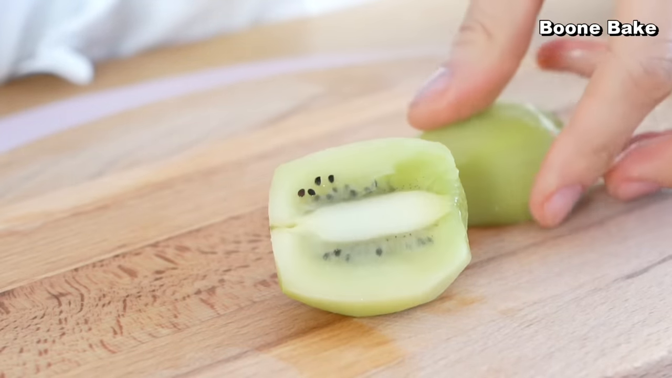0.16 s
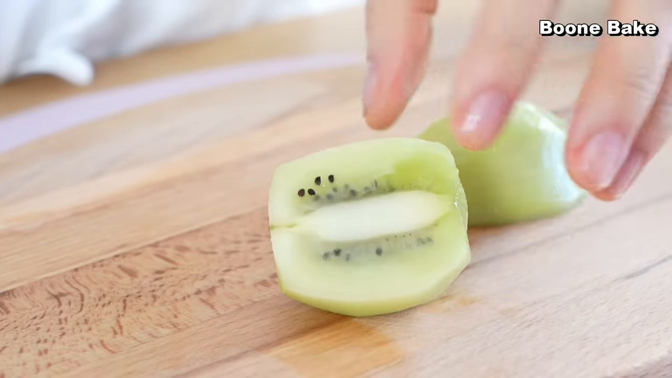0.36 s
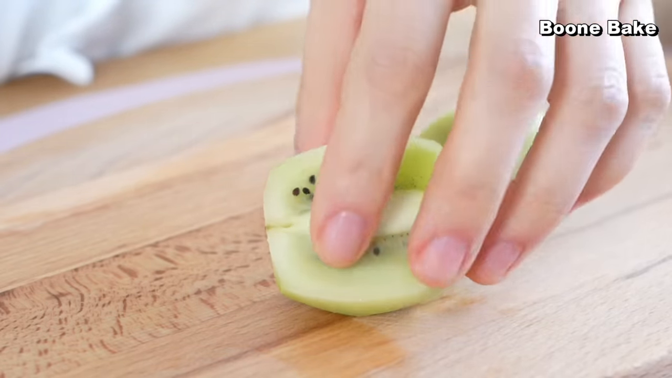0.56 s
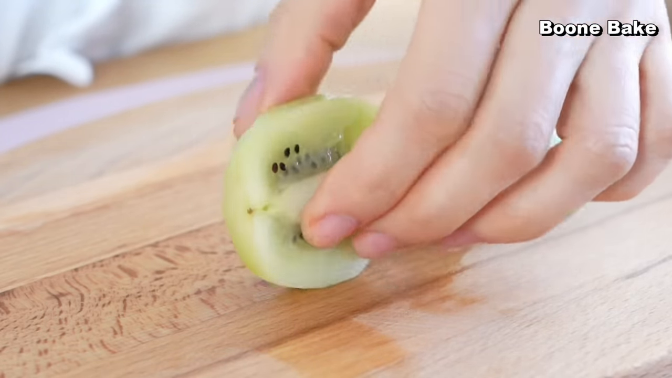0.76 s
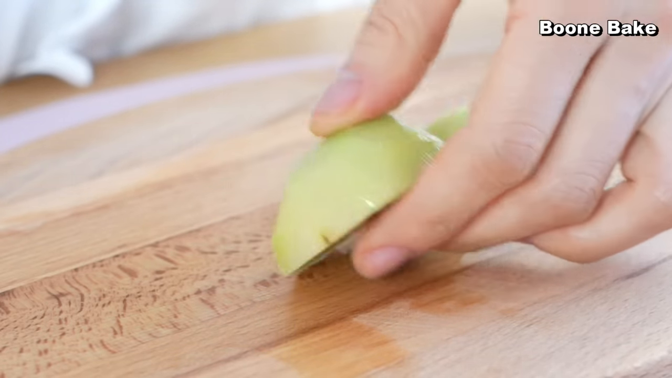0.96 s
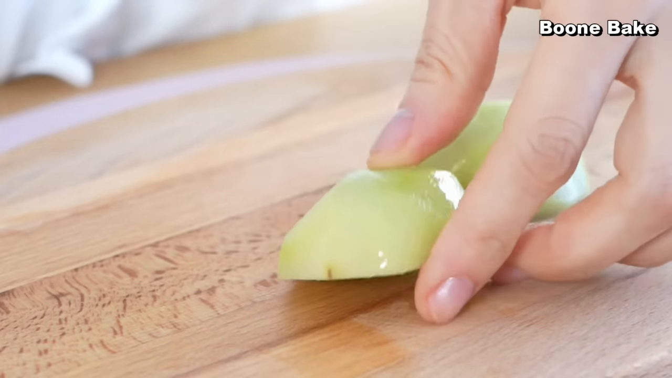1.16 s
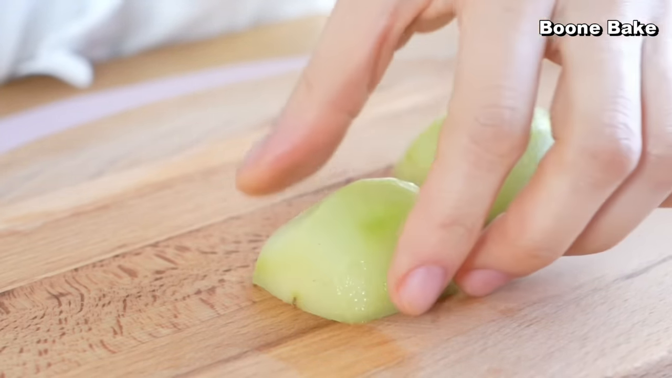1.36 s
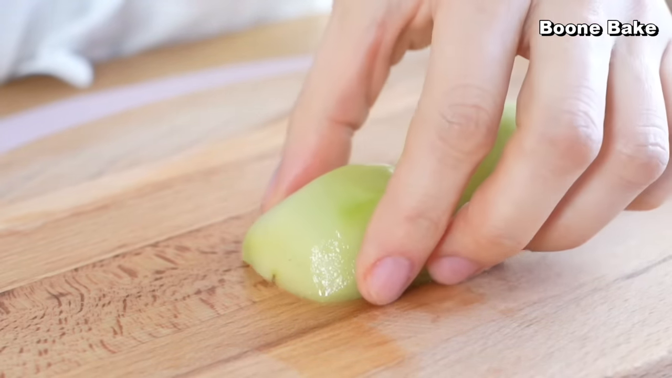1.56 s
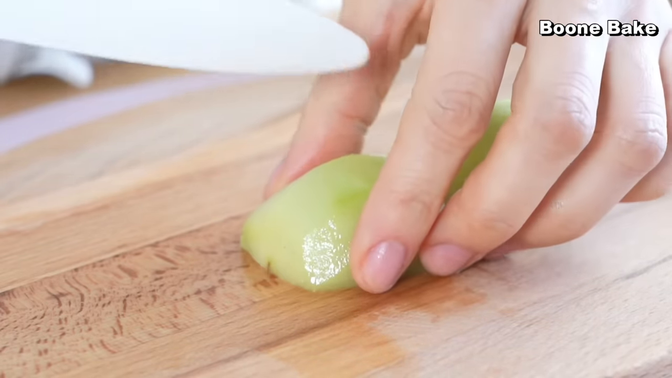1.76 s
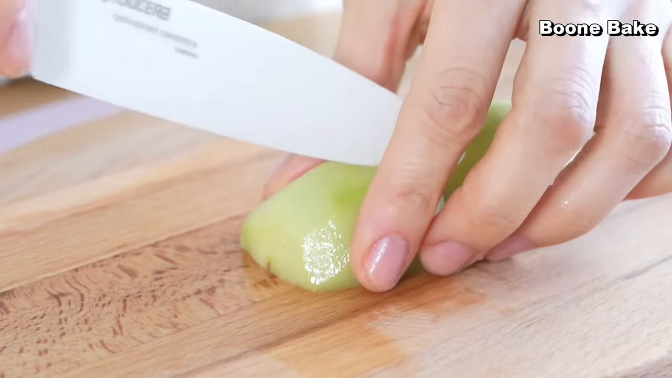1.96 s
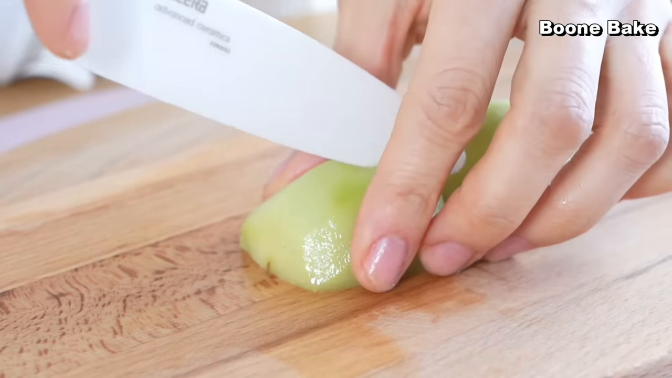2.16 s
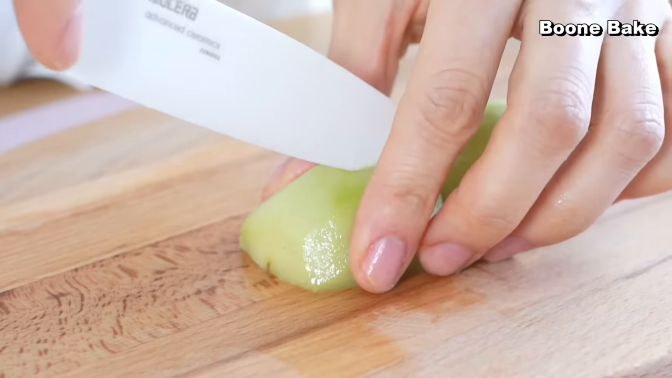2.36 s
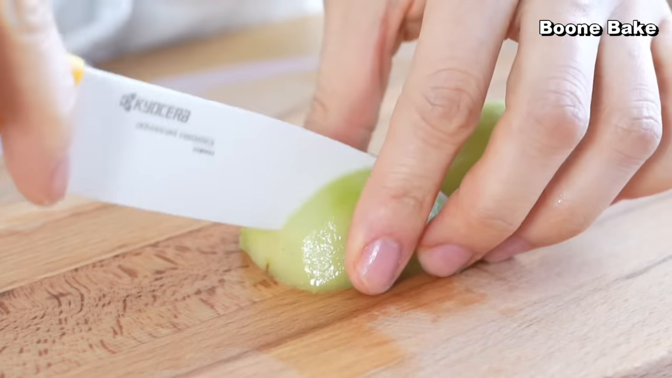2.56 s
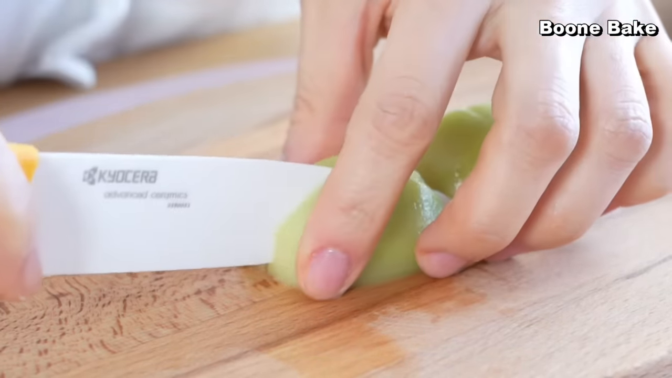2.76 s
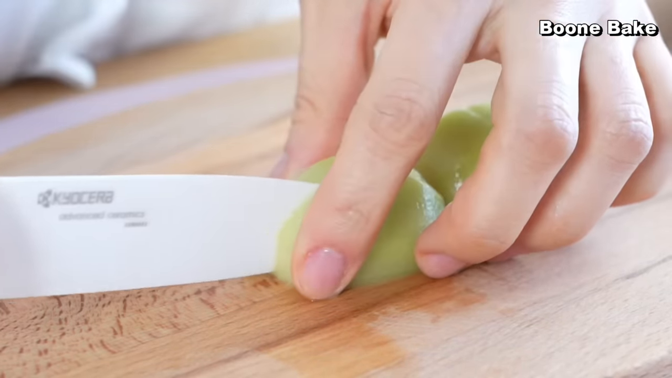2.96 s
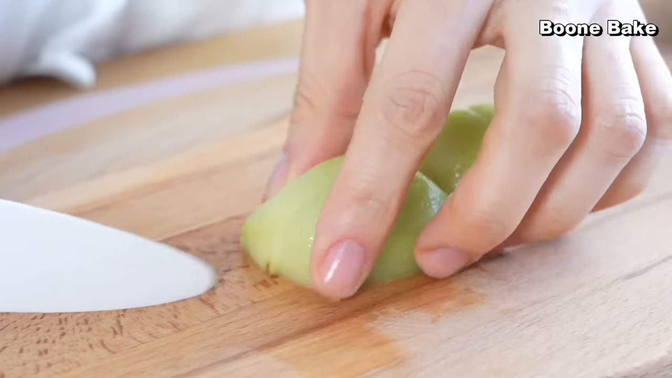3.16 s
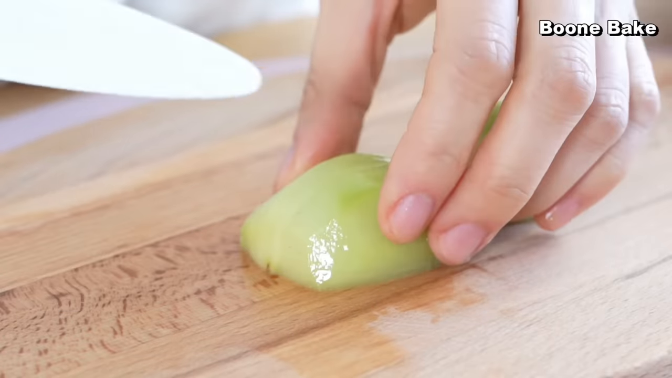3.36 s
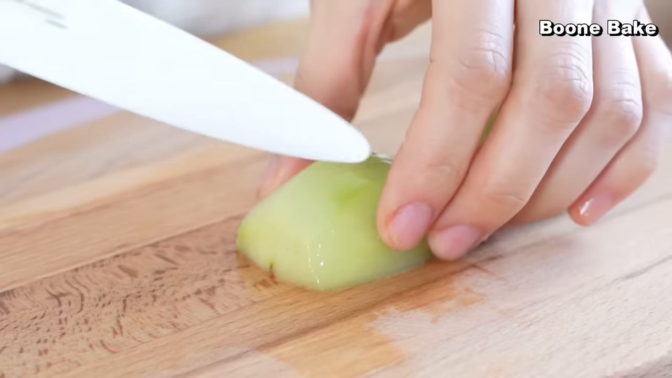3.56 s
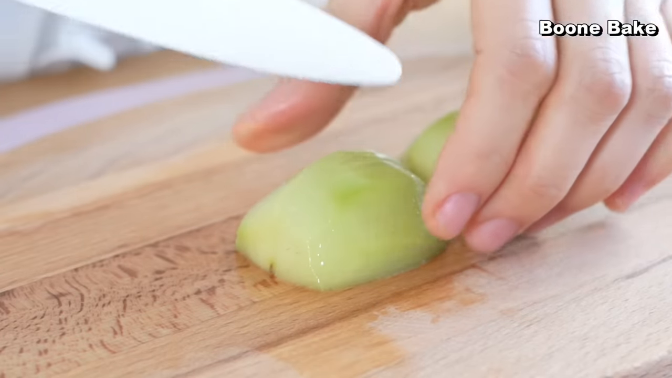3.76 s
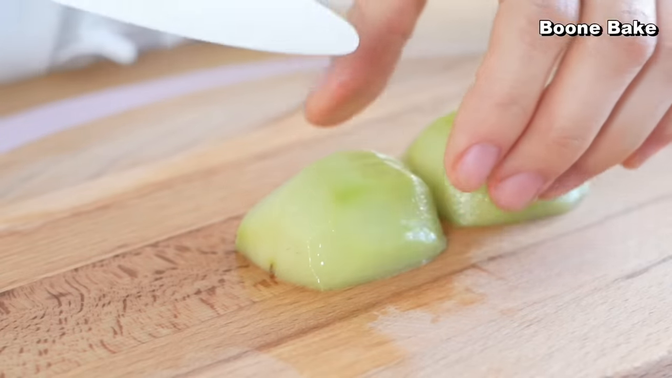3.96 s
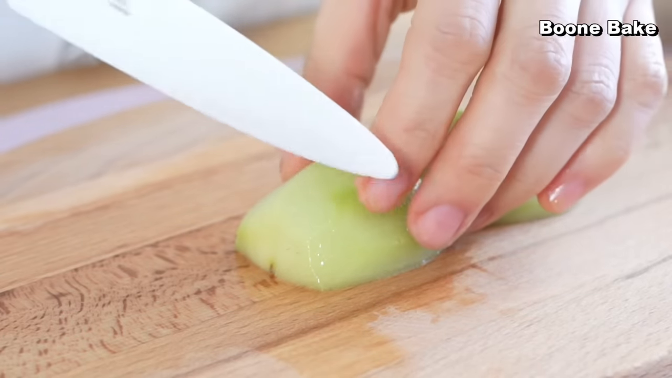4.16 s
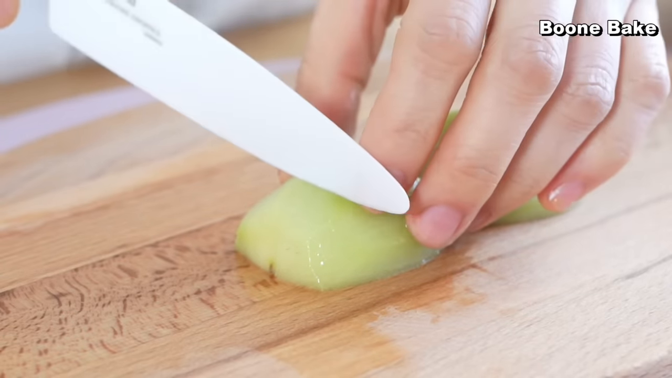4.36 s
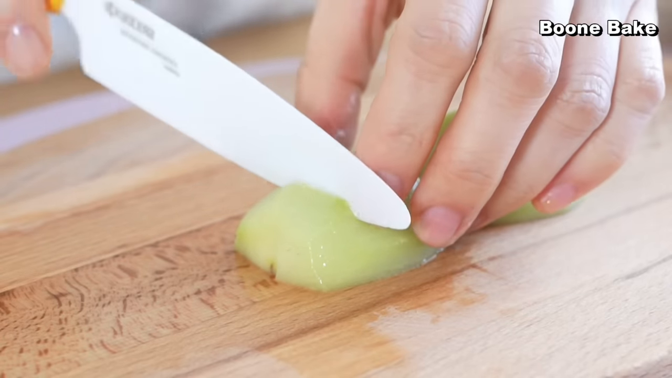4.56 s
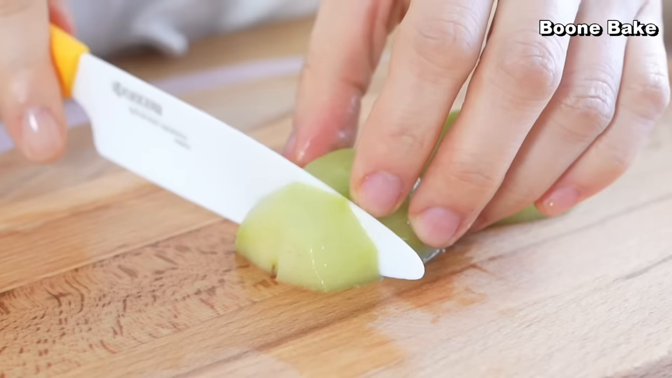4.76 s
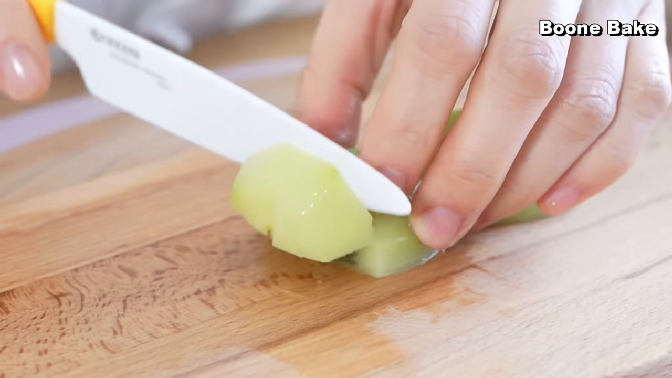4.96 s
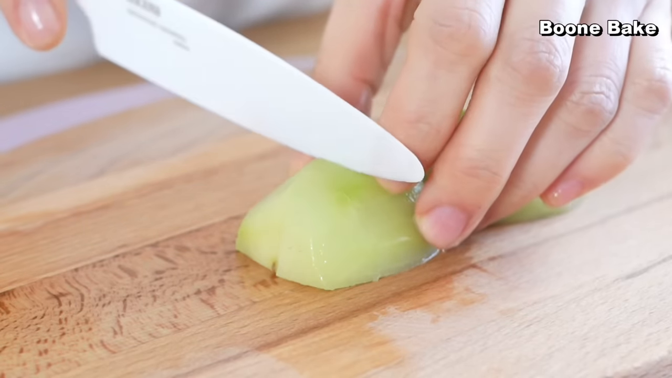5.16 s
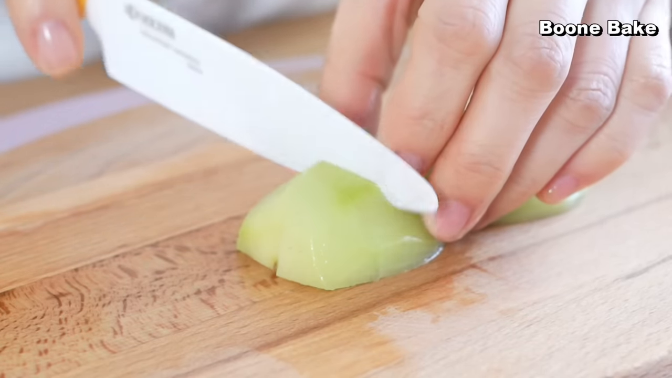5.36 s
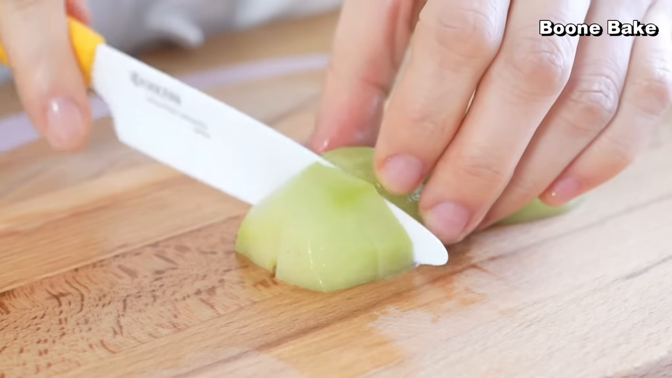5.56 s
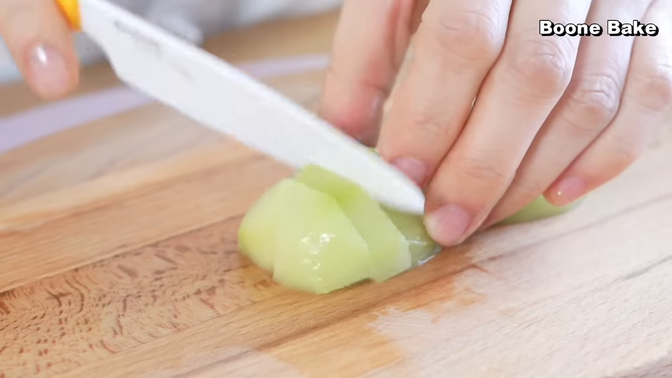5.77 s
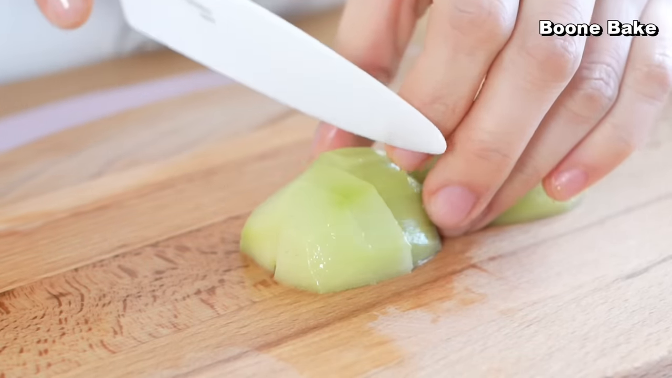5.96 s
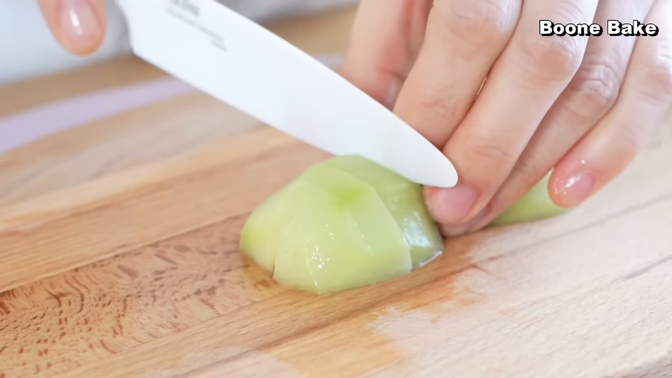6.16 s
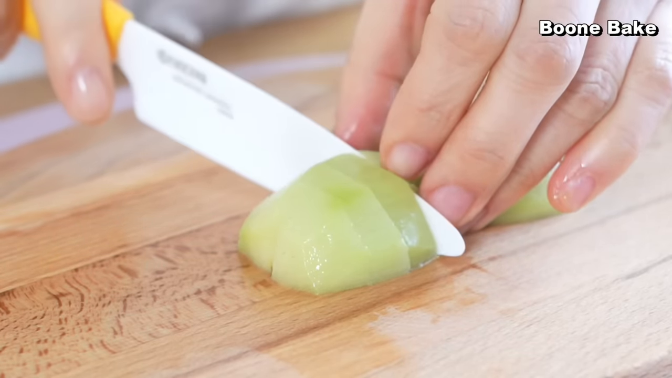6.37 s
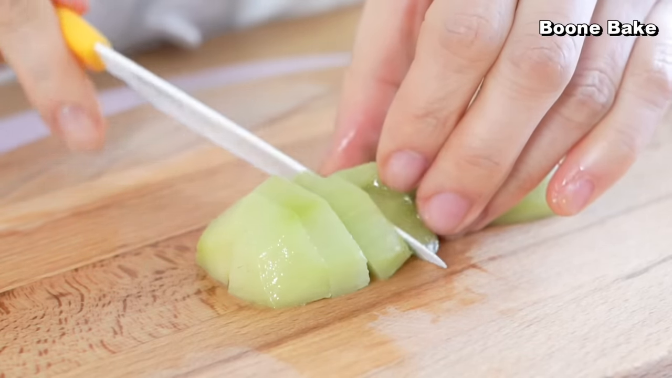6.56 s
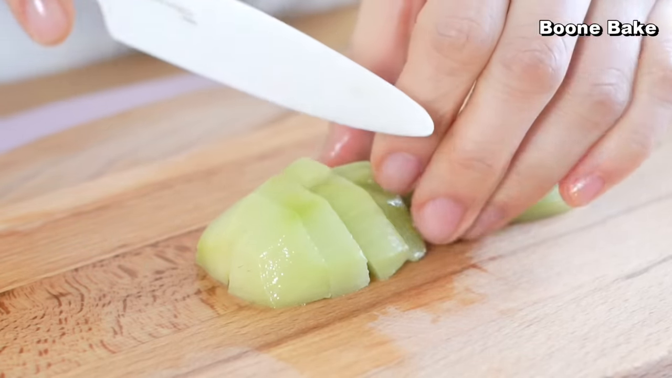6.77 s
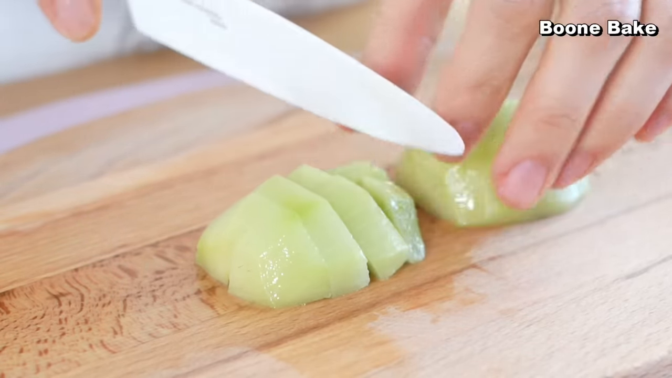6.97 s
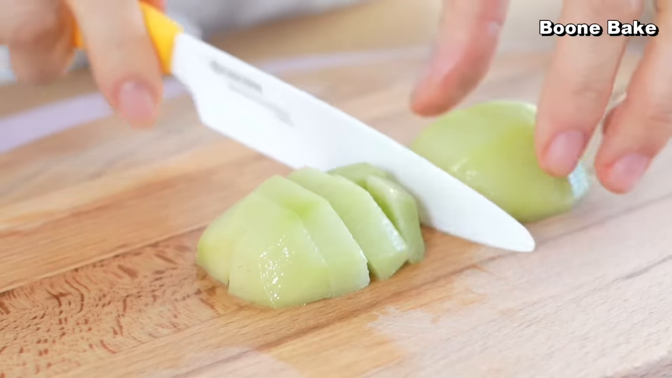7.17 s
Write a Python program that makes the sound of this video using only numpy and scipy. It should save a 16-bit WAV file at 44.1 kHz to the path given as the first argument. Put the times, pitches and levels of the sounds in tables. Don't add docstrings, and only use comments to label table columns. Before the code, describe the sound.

A quiet kitchen with soft hiss and a very low table sway, miked closely in mono. At 0.1 s fingers brush and squeak faintly on wet fruit, then a dull woody bump at 0.17. Another brush leads to a second, slightly clickier bump at 1.28, with a faint touch at 1.47. Tiny sticky ticks gather from 2.1. The first cut rasps wetly from 2.43, catches briefly, and knocks the wood at 2.53. From 2.9 to 3.25 the blade drags back, scratchy and brightening into a thin squeal. Near quiet follows, with a faint touch at 4.3. Stronger wet slides end in hard, short knocks at 4.73, 5.51 and 6.35, the table rumbling low after each. Bright juice snaps click at 4.86 and 5.65, with small ones around 6.5. Light bumps fall near 5.15. The background dips slightly after 6.64, until a final solid knock at 7.16 and a brief rubbing settle.

```python
import sys
import numpy as np
from scipy import signal
from scipy.fft import rfft, irfft
from scipy.io import wavfile
from scipy.ndimage import uniform_filter1d

SR = 44100
rng = np.random.default_rng(int(sys.argv[2]) if len(sys.argv) > 2 else 0)


def log_audio(samples):
    frames = np.atleast_2d(samples).T
    limited = np.clip(frames, -1, 1)
    pcm = np.round(limited * 32767).astype(np.int16)
    wavfile.write(sys.argv[1], SR, pcm)


def linear_from_db(decibels):
    return 10 ** (np.asarray(decibels, float) / 20)


N = 318402

# time_s, level_db
AIR_LEVEL = [(0, -63.5), (.4, -61.5), (1.0, -60), (1.5, -62), (1.95, -57.5), (2.15, -60.5), (2.6, -59.5),
             (3.3, -58), (3.6, -57), (4.3, -59.5), (5.9, -61), (6.2, -59.5), (6.6, -59), (7.22, -62.5)]
# pitch_hz, level_db (per Hz)
AIR_TONE = [(15, -35.5), (25, -6), (49, -10), (300, -17.5), (500, -21.5), (2000, -30.5), (13200, -41),
            (16000, -48.5)]
# strongest_s, level_db, pitch_hz, rise_s, fall_s
TABLE_ROCKS = [(0.0, -46.5, 36, .1, 0.08), (.3, -56.5, 21.6, 0.12, 0.36), (1.41, -51, 38, .2, .1),
               (1.71, -47, 22.2, 0.14, 0.13), (2.689, -32, 18, 0.1, 0.076), (2.87, -37.5, 16.5, .05, 0.11),
               (3.1, -42.5, 21, 0.086, 0.087), (3.45, -53, 21, 0.3, 0.25), (3.9, -52, 25, 0.23, 0.13),
               (4.83, -36.5, 21.4, .07, 0.1), (4.97, -37, 22.2, 0.095, .22), (5.35, -48, 22.2, 0.061, .1),
               (5.718, -33, 22.2, 0.17, 0.17), (6.15, -53, 23, 0.11, 0.24), (6.588, -30, 22.8, 0.19, 0.16),
               (6.95, -47.5, 22.2, .15, 0.11)]
# start_s, rumble_db, rasp_db, blade_db
SETTLES = [
    (0.0, -52.5, -50, -56.5),
    (4.875, -56, -54, -74),
    (5.665, -53, -42.5, -57),
    (7.175, -43, -41, -68),
]
# centre_s, length_s, rasp_db, hiss_db
BRUSHES = [
    (.12, 0.075, -54, -61),
    (1.165, 0.082, -54, -63),
    (4.944, 0.011, -53, -47),
]
# entry_s, full_speed_s, rumble_db, rasp_db, hiss_db
CUTS = [
    (2.43, 2.497, -35, -42.5, -46.5),
    (4.55, 4.675, -33, -39, -45),
    (5.345, 5.456, -33, -39, -44.5),
    (6.25, 6.293, -31.5, -38, -43.5),
]
# time_s, loss_db
CATCHES = [
    (2.517, 17),
    (4.632, 7),
    (5.472, 9.5),
    (6.316, 4),
]
# time_s, pressure_db
DRAW_BACK = [
    (2.9, -69),
    (2.974, -47),
    (3.05, -45),
    (3.064, -45.5),
    (3.14, -41),
    (3.232, -42.5),
    (3.258, -68),
    (3.3, -75),
]
# pitch_hz, width_hz, level_db
RUMBLE_PEAKS = [(110, 47, -3.5), (139, 31, 1), (182, 42, -3.5), (261, 31, -2.5), (309, 49, -7),
                (383.5, 55, -13)]
# pitch_hz, width_hz, level_db
RASP_PEAKS = [(415, 130, -8.5), (696, 190, -4), (1050, 370, 1), (1350, 540, 0), (1680, 420, -3),
              (2116, 440, -8.5)]
# pitch_hz, width_hz, level_db
BLADE_LOW_PEAKS = [(3200, 1400, 2), (4220, 590, 7.5), (4800, 780, 3), (6310, 1100, 2.5), (6720, 300, -15.5)]
# pitch_hz, width_hz, level_db
BLADE_HIGH_PEAKS = [(8540, 720, 4.5), (9640, 910, -7), (12300, 980, -9), (13260, 1200, -2),
                    (14400, 700, -11), (15500, 700, -9)]
# start_s, length_s, pitch_hz, width_hz, level_db (rms)
SQUEAKS = [(0.083, 0.074, 3670, 500, -59.5), (1.133, 0.06, 2230, 300, -58), (1.139, .06, 3500, 300, -60),
           (2.475, 0.044, 3200, 300, -54), (2.94, 0.14, 4040, 350, -55.5), (2.98, .12, 2150, 300, -49),
           (3.12, 0.15, 6500, 600, -49.5), (4.6, 0.1, 8600, 500, -56), (4.57, .07, 3880, 400, -55),
           (6.27, 0.051, 8700, 497.5, -52), (3.011, 0.064, 1050, 70, -43), (3.077, .04, 6050, 600, -46),
           (3.135, 0.051, 8600, 90, -42.5), (3.2, .075, 15400, 150, -60), (5.155, .055, 8400, 500, -73),
           (5.372, 0.093, 3830, 300, -55.5)]
# time_s, knock_db, thud_db, crack_db, upper_knock_db
BLOWS = [(0.1663, -27, -24.5, -37, -42.5), (1.276, -28.5, -26.5, -30, -42.5), (1.468, -59, -55, -56, -67),
         (2.527, -19, -37, -45, -34), (4.319, -63, -49.5, -65, -73), (4.727, -11.5, -32.5, -36, -33),
         (5.149, -47, -36.5, -39.5, -55), (5.2, -58, -42, -44, -68), (5.506, -9.5, -34.5, -43, -25.5),
         (6.064, -64, -51.5, -45, -69), (6.352, -16, -31.5, -40, -36), (7.163, -18, -43, -45, -31.5)]
# pitch_hz, level_db, t60_s (time to fade by 60 dB)
THUD_MODES = [(122, 3.5, .04), (120, -11.5, 0.2), (145.6, -16, .45), (145.7, -9, 0.24), (185, -13, .12)]
# pitch_hz, level_db, t60_s
FLEX_MODES = [(250, -3.5, 0.11), (265.3, -1.5, .2), (301, -2, 0.13), (376, -4.5, 0.21), (493, -8, .08)]
# pitch_hz, level_db, t60_s
KNOCK_MODES = [(510, -21, 0.02), (681, -12, 0.041), (726, -7.5, 0.023), (927, -0.5, 0.02), (1050, 0, .022),
               (1253, -8.5, 0.012)]
# pitch_hz, level_db, t60_s
UPPER_KNOCK_MODES = [(1580, 1.5, .015), (1750, -3.5, 0.0098), (2120, 2, 0.012), (2315, -5, 0.0068),
                     (2960, -10.5, 0.01), (3500, -14, 0.012), (4400, -14.5, 0.0072)]
# pitch_hz, t60_s
ROOM_DECAY = [(125, 0.99), (250, 0.93), (500, 0.74), (1000, 0.52), (2000, 0.44), (4000, 0.29), (8000, 0.33),
              (16000, 0.085)]
# time_s, peak_db, pitch_hz
TICKS = [(1.414, -47, 12000), (2.135, -48, 6000), (2.184, -43.5, 6000), (2.33, -47, 5000),
         (2.389, -45, 8000), (2.40, -45, 7050), (2.44, -42, 6500), (2.462, -40, 8000), (2.612, -45, 8000),
         (2.622, -42, 11000), (2.696, -42, 12000), (2.868, -53, 5000), (4.476, -37.5, 4100),
         (4.64, -31, 7000), (4.896, -43, 7000), (5.367, -43, 4000), (5.401, -33.5, 6000),
         (5.455, -36, 8000), (5.775, -40, 4000), (6.143, -46, 6000), (6.158, -46, 8000), (6.177, -42, 8040),
         (6.189, -40.5, 5000), (6.223, -39, 5000), (6.522, -37, 10100), (6.696, -47, 6000),
         (6.904, -46, 4560)]
# time_s, peak_db, pitch_hz,
# length_ms, width_ratio
JUICE_SNAPS = [(2.185, -39.5, 2130, 1.5, 1.3), (4.853, -25, 7000, 4.2, 2.2), (4.856, -18, 4970, 1.24, 2.5),
               (4.859, -12.5, 4440, 1.2, 1.62), (4.8591, -11.5, 2390, 3, 2.3), (4.86, -18, 6900, 1.4, 1.36),
               (4.938, -30.5, 3400, 5, 1.09), (4.941, -35, 4270, 5, 1.1), (4.942, -44, 8750, 4, 1),
               (5.149, -36, 8600, 2.2, 0.93), (5.20, -49, 4000, 3, 1.02), (5.619, -38, 4970, 3, 1.24),
               (5.649, -13.5, 4860, 2.7, 1.74), (5.653, -17.5, 5600, 1.7, 2.7),
               (5.657, -32, 5970, 1.5, 2.1), (6.463, -26, 5300, 1.6, 1.42), (6.463, -29.5, 1750, 2.7, 1.29),
               (6.546, -40, 6060, 3, 1.2), (7.163, -21, 1350, 4, 1.16), (7.1637, -38, 4700, 3, 1.1)]
# time_s, level_db
MIX_LEVEL = [
    (6.64, -2.5),
    (6.642, -13.5),
    (7.15, -11.5),
    (7.16, 0.5),
]


def rms_one(x):
    return x / np.sqrt(np.mean(x ** 2) + 1e-20)


def in_time(rows, outside=None):
    time_s, *columns = np.transpose(rows)
    t = np.arange(N) / SR
    return np.array([np.interp(t, time_s, column, outside, outside) for column in columns])


def band(x, low_hz, high_hz):
    limits = [low_hz, min(high_hz, .45 * SR)]
    return signal.sosfilt(signal.butter(2, limits, "band", fs=SR, output="sos"), x)


def cut_above(x, hz):
    return signal.sosfilt(signal.ellip(10, .5, 60, hz, fs=SR, output="sos"), x)


def drift(rate_hz):
    steps = int(N / SR * rate_hz) + 3
    return np.interp(np.arange(N) * rate_hz / SR, np.arange(steps), rng.standard_normal(steps))


def ring(force, hz, t60):
    r = linear_from_db(-60 / (t60 * SR))
    turn = 2 * np.pi * hz / SR
    return signal.lfilter([0, np.sin(turn)], [1, -2 * r * np.cos(turn), r * r], force + 1e-18)


def resonances(x, peaks, patchy_db):
    out = 0
    for k, (hz, width_hz, level_db) in enumerate(peaks):
        r = np.exp(-np.pi * width_hz / SR)
        poles = [1, -2 * r * np.cos(2 * np.pi * hz / SR), r * r]
        gain = linear_from_db(level_db + patchy_db * drift(18))
        out = out + (-1) ** k * gain * signal.lfilter([1 - r, 0, r - 1], poles, x)
    return out


def burst(start_s, peak_db, hz, length_ms, width):
    age = np.arange(1200) / SR / (length_ms / 1000)
    first_snap = 3 * (age == 0)
    snaps = (rng.standard_normal(len(age)) ** 3 + first_snap) * np.exp(-age ** 2)
    sound = band(snaps, hz / width, hz * width)
    out = np.zeros(N + len(age))
    i = round(start_s * SR)
    out[i:i + len(age)] = linear_from_db(peak_db) * sound / np.abs(sound).max()
    return out[:N]


def air():
    hz = np.arange(N // 2 + 1) * SR / N + 1
    corner_hz, tone_db = np.transpose(AIR_TONE)
    tone = linear_from_db(np.interp(np.log(hz), np.log(corner_hz), tone_db))
    shaped = rfft(rng.standard_normal(N)) * tone
    low_share = 1 / (1 + (hz / 900) ** 2)
    hiss_db = in_time(AIR_LEVEL)[0]
    rumble_db = -55.5 + 0.32 * (hiss_db - hiss_db.mean())
    rumble = rms_one(irfft(shaped * low_share, N)) * linear_from_db(rumble_db + .8 * drift(9))
    hiss = rms_one(irfft(shaped * (1 - low_share), N)) * linear_from_db(hiss_db + 1.3 * drift(14))
    return rumble + hiss


def sway():
    age = np.arange(N) / SR - np.array(TABLE_ROCKS)[:, :1]
    level_db, hz, rise_s, fall_s = np.array(TABLE_ROCKS).T[1:, :, None]
    swell = np.exp(-(age / np.where(age < 0, rise_s, fall_s)) ** 2)
    rocking = linear_from_db(level_db) * swell * np.cos(2 * np.pi * hz * age)
    return np.sqrt(2) * np.sum(rocking, axis=0)


def settle_strokes(t):
    gains, fall_db_per_s, sizzle_db = np.zeros((4, N)), 199, -5
    for start_s, rumble_db, rasp_db, blade_db in SETTLES:
        start_db = np.array([[rumble_db], [rasp_db], [blade_db], [blade_db + sizzle_db]])
        gains += (t >= start_s) * linear_from_db(start_db - fall_db_per_s * np.abs(t - start_s))
    return gains


def brush_strokes(t):
    gains, rumble_db, sizzle_db = np.zeros((4, N)), -0.5, -4
    for centre_s, length_s, rasp_db, hiss_db in BRUSHES:
        top_db = np.array([[rasp_db + rumble_db], [rasp_db], [hiss_db], [hiss_db + sizzle_db]])
        gains += linear_from_db(top_db) * np.exp(-(2 * (t - centre_s) / length_s) ** 2)
    return gains


def cut_strokes(t):
    gains, catch_s = np.zeros((4, N)), 0.007
    entry_db, rumble_rise_db, rumble_bend, sizzle_db = -24.5, 28, 2.38, -1
    stall_db = sum(loss_db * np.exp(-((t - s) / catch_s) ** 2) for s, loss_db in CATCHES)
    for entry_s, full_s, rumble_db, rasp_db, hiss_db in CUTS:
        wood_s = min(blow[0] for blow in BLOWS if blow[0] > full_s)
        inside = (t > entry_s) & (t < wood_s)
        speed_db = entry_db * np.clip((full_s - t) / (full_s - entry_s), 0, 1) - stall_db
        depth_left = np.clip((wood_s - t) / (wood_s - entry_s), 0, 1)
        push_db = -rumble_rise_db * depth_left ** rumble_bend
        levels_db = [push_db + rumble_db, speed_db + rasp_db, speed_db + hiss_db, speed_db + hiss_db + sizzle_db]
        gains += inside * linear_from_db(np.array(levels_db))
    return gains


def draw_strokes():
    start_db = (-26, 1, -6, -15)
    end_db = (-1.5, 1.6, 2, 1.5)
    tilt_db = in_time([(DRAW_BACK[1][0], *start_db), (DRAW_BACK[-3][0], *end_db)])
    return linear_from_db(in_time(DRAW_BACK, outside=-120) + tilt_db)


def strokes():
    t = np.arange(N) / SR
    gains = settle_strokes(t) + brush_strokes(t) + cut_strokes(t) + draw_strokes()
    return uniform_filter1d(gains, size=200, axis=1)


def grit(per_s, spread_db):
    sizes = linear_from_db(spread_db * np.minimum(rng.exponential(1, N), 5)) * rng.choice([-1, 1], N)
    return sizes * (rng.random(N) < per_s / SR)


def slides():
    fibres, juice = grit(1600, 2.7), grit(9000, 2.52)
    rumble = resonances(fibres, RUMBLE_PEAKS, patchy_db=1.4)
    rasp = resonances(fibres + .45 * juice, RASP_PEAKS, patchy_db=2.45)
    film = juice[::-1]
    hiss = resonances(juice, BLADE_LOW_PEAKS, patchy_db=0.35) + linear_from_db(-10) * band(film, 2400, 7800)
    sizzle = resonances(juice, BLADE_HIGH_PEAKS, patchy_db=5.2) + linear_from_db(-6.5) * band(film, 7000, 15500)
    uneven = [rms_one(layer) * linear_from_db(1.4 * drift(40)) for layer in (rumble, rasp, hiss, sizzle)]
    layers = np.array(uneven) * strokes()
    return layers[0], linear_from_db(-1.18) * layers[1:].sum(axis=0)


def squeaks():
    out = np.zeros(N)
    for start_s, length_s, hz, width_hz, level_db in SQUEAKS:
        noise = rng.standard_normal(int(length_s * SR))
        r = np.exp(-np.pi * width_hz / SR)
        resonance = [1, 0, -1, 1, -2 * r * np.cos(2 * np.pi * hz / SR), r * r]
        whistle = rms_one(signal.sosfilt([resonance, resonance], noise))
        swell = np.hanning(len(noise)) ** .5
        i = round(start_s * SR)
        out[i:i + len(noise)] += linear_from_db(level_db) * whistle * swell
    return out


def strike(modes, level_db, spread_db, contact_s, sign):
    at = np.round(np.array(BLOWS)[:, 0] * SR).astype(int)
    luck = rng.standard_normal((len(BLOWS), len(modes)))
    push = np.hanning(int(contact_s * SR) + 3)
    out = np.zeros(N)
    for k, (hz, mode_db, t60) in enumerate(modes):
        force = np.zeros(N)
        force[at] = linear_from_db(level_db + mode_db + spread_db * luck[:, k])
        out += sign ** k * ring(force, hz, t60)
    return np.convolve(out, push / push.sum())[:N]


def blows():
    time_s, knock_db, thud_db, crack_db, upper_db = np.transpose(BLOWS)
    flex_db = 0.36 * knock_db + (1 - 0.36) * thud_db - 8.5
    thud = -strike(THUD_MODES, thud_db + 7.0, spread_db=0.5, contact_s=0.002, sign=1.0)
    flex = strike(FLEX_MODES, flex_db, spread_db=4.0, contact_s=.001, sign=-0.94)
    knock = strike(KNOCK_MODES, knock_db - .6, spread_db=2.5, contact_s=0.00024, sign=-1.112)
    upper = strike(UPPER_KNOCK_MODES, upper_db + 3.5, spread_db=5.0, contact_s=.0001, sign=-1.077)
    crush = sum(burst(s, db - 6.5, 925, 4.55, width=1.95) for s, db in zip(time_s, knock_db))
    crush = crush + sum(burst(s, db - 1, 2100, 2.9, width=1.4) for s, db in zip(time_s, upper_db))
    crack = sum(burst(s, db + 2.9, 4400, 2.4, width=2.1) for s, db in zip(time_s, crack_db))
    return thud + flex, knock + upper + crush + crack


def wash():
    time_s, knock_db, thud_db, crack_db, upper_db = np.transpose(BLOWS)
    knock_wash = (500, 1500, -20, 0.44)
    upper_wash = (1300, 2900, -10.5, 0.31)
    out = np.zeros(N)
    for blow_db, (low_hz, high_hz, under_db, t60) in ((knock_db, knock_wash), (upper_db, upper_wash)):
        starts = np.zeros(N)
        starts[np.round(time_s * SR).astype(int)] = linear_from_db(blow_db + under_db)
        fading = signal.lfilter([1], [1, -linear_from_db(-60 / (t60 * SR))], starts + 1e-18)
        out += rms_one(band(rng.standard_normal(N), low_hz, high_hz)) * fading
    return out


def ticks():
    return sum(burst(s, peak_db, hz, length_ms=2.6, width=1.6) for s, peak_db, hz in TICKS)


def juice_snaps():
    return sum(burst(s, peak_db, hz, length_ms, max(width, 1.05))
               for s, peak_db, hz, length_ms, width in JUICE_SNAPS)


def kitchen(x):
    room_db, gap_s = -30.5 - 5.0, 0.0037
    t = np.arange(SR) / SR
    white = rng.standard_normal((2, SR))
    tail = 0
    for k, (hz, t60) in enumerate(ROOM_DECAY):
        octave = band(white[k % 2], hz / np.sqrt(2), hz * np.sqrt(2))
        tail = tail + octave * linear_from_db(-60 * t / t60)
    tail = tail * np.clip(t / gap_s - .5, 0, 1)
    return linear_from_db(room_db) * signal.fftconvolve(x, tail)[:N]


def scene():
    rumble, slide = slides()
    thud, knock = blows()
    snaps = juice_snaps()
    low = band(thud + rumble, 67, 3000)
    smooth = slide + squeaks() + ticks()
    echoes = kitchen(linear_from_db(-3.5) * knock + snaps + smooth + linear_from_db(-10.5) * low)
    smooth = smooth + echoes + air() + wash()
    mix = low + knock + snaps + cut_above(smooth, 15750) + sway()
    return mix[None]


def top_cut(x):
    return signal.sosfilt(signal.butter(12, 16970, fs=SR, output="sos"), x)


def record(dry):
    mix = cut_above(dry * linear_from_db(in_time(MIX_LEVEL)), 16900)
    return top_cut(mix)


dry = scene()
out = record(dry)
log_audio(out)
```